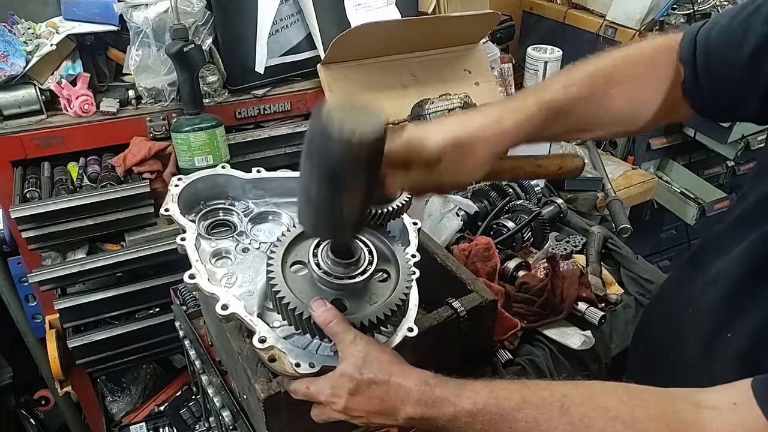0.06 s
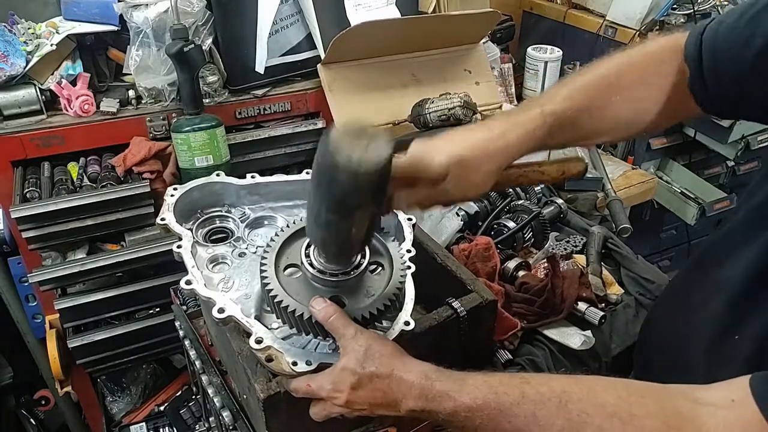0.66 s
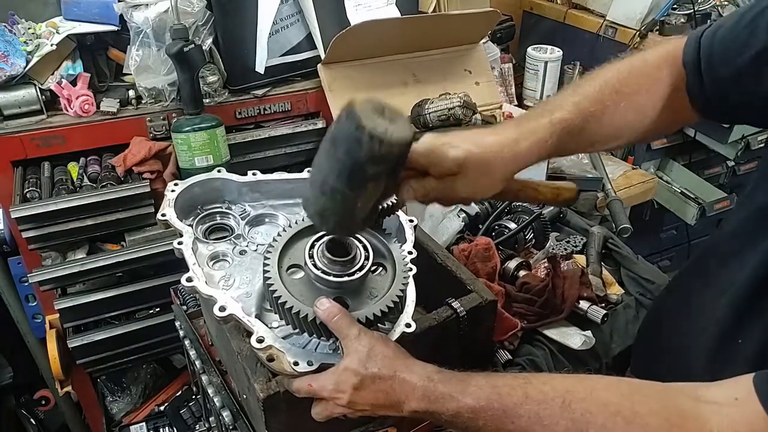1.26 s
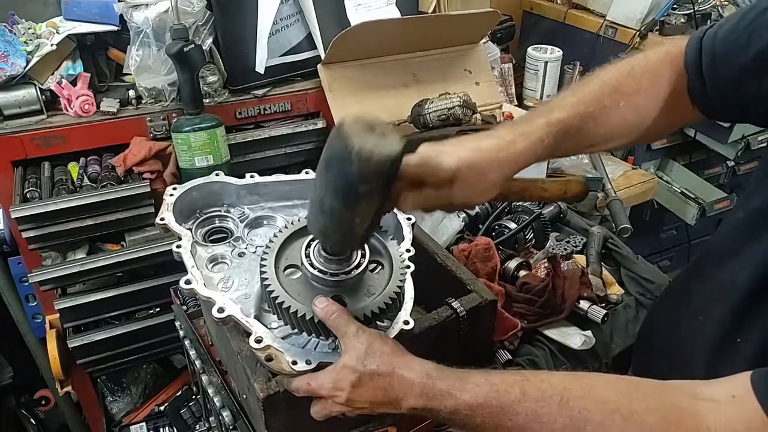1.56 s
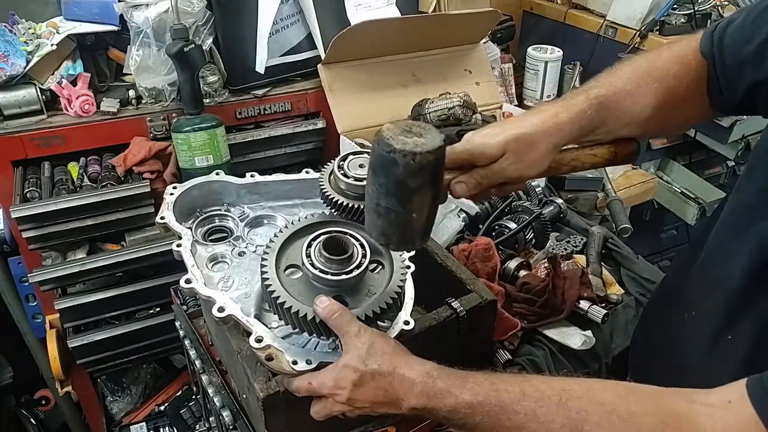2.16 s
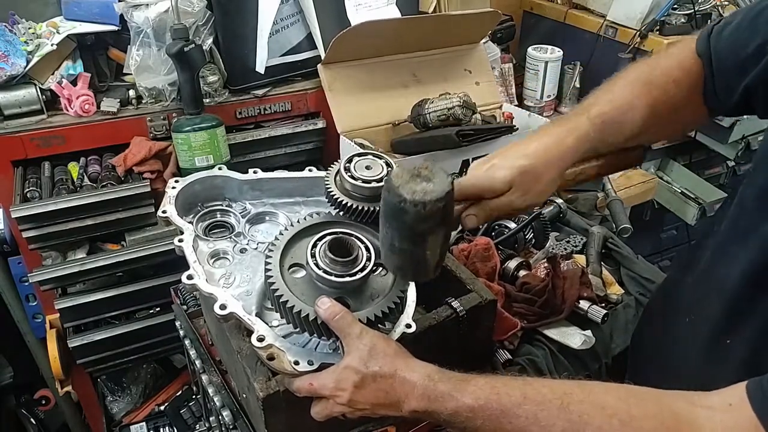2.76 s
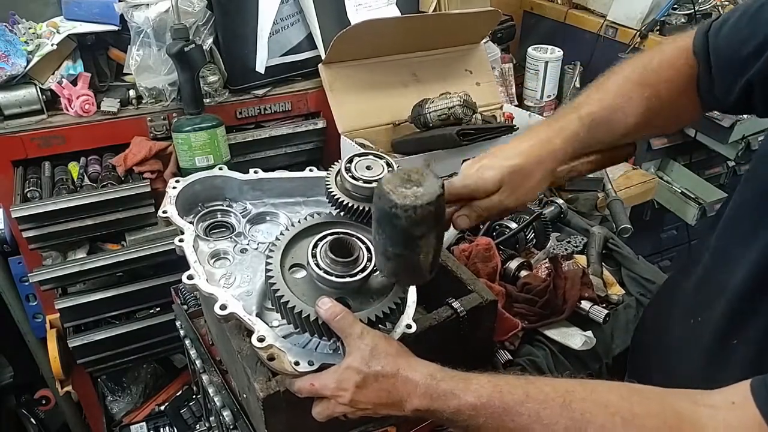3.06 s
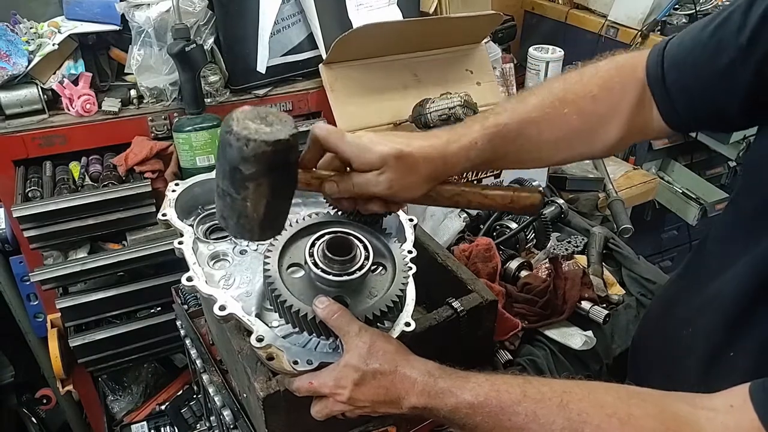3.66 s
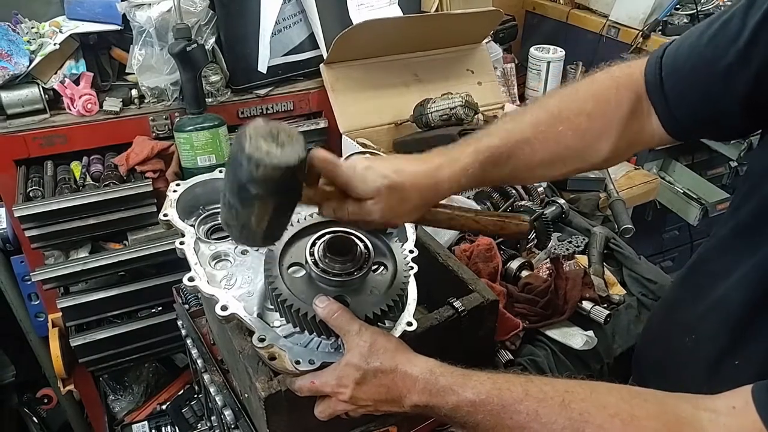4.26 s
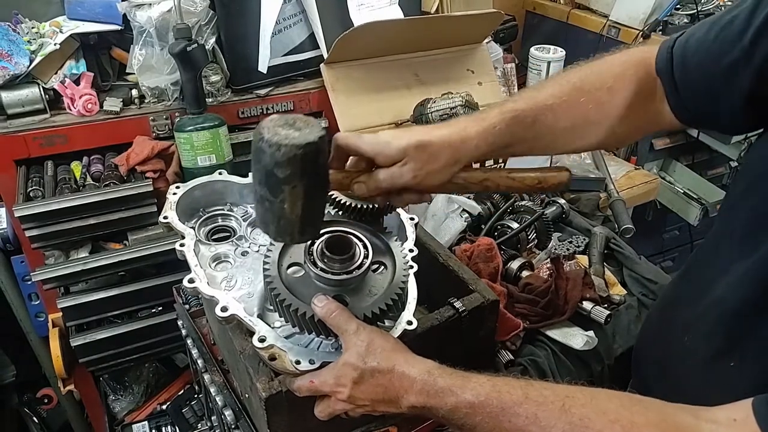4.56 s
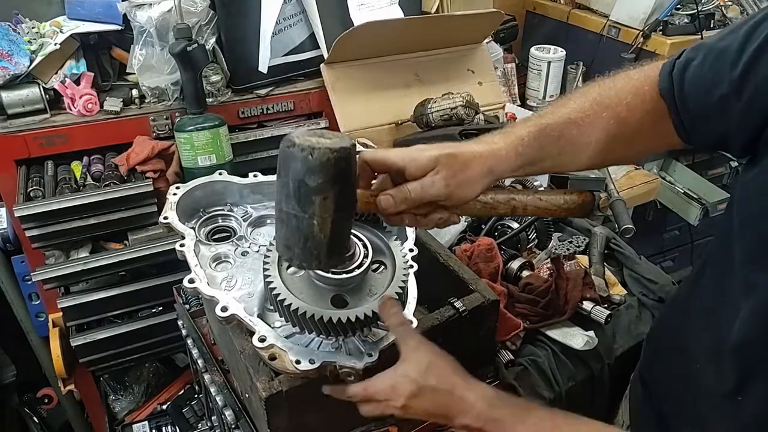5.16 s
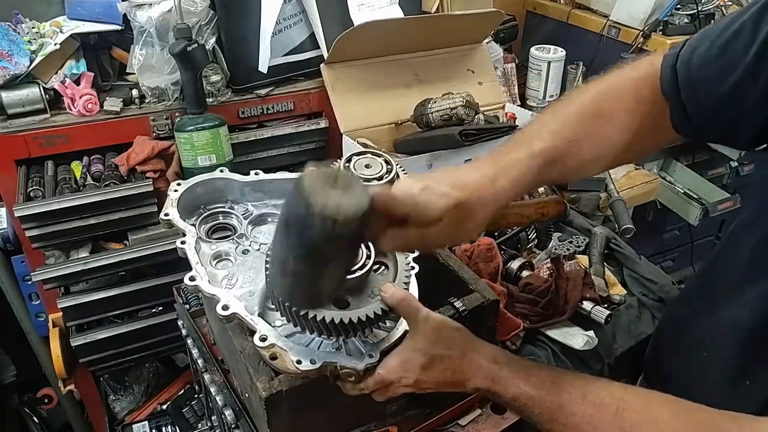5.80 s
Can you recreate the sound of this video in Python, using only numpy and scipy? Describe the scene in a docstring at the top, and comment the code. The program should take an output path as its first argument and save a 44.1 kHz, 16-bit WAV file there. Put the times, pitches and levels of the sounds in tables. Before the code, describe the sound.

A rubber mallet taps a steel gear in a metal case, each blow thudding with a clank and brief metallic ring.

```python
"""A workshop bench in a small, cluttered room, where a rubber mallet drives a steel gear and its bearing
into an aluminium gearbox case. Each impact excites damped modes: bench and case thump, loose parts
clank, and the gear rings like a bell, two close modes beating. The parts settle with a few light
knocks. Behind them a fan gives a rush of air and a motor hum."""
import sys
import numpy as np
from scipy import signal
from scipy.io import wavfile

SR = 44100
rng = np.random.default_rng(int(sys.argv[2]) if len(sys.argv) > 2 else 0)


def to_wav(sig):
    """Store sig (one row per channel, or 1-D mono) as 16-bit WAV at the path in sys.argv[1].

    Samples outside -1..1 are clipped; the rate is SR.
    """
    pcm = np.clip(np.atleast_2d(sig), -1, 1) * 32767
    pcm = np.round(pcm).astype(np.int16)
    wavfile.write(sys.argv[1], SR, pcm.T)  # frames by channels


N = 265923

# mallet blows: (time [s], spot, force [dB], contact hardness [dB], gear note [dB], free ringing [s])
BLOWS = [(0.0966, "hub", -1, -3, -12.5, 0.75), (0.3869, "hub", 1.64, -1.5, -18.5, .22),
         (0.6866, "hub", 2, 7.5, -16.5, 0.14), (1.008, "hub", 2, -4.5, -17, 0.19),
         (1.315, "hub", -0.36, -6.5, -21, 0.13), (1.5942, "hub", 0.5, 9, -14, .16),
         (2.454, "right rim", -3, -0.5, -18.5, 0.12), (2.6787, "right rim", 0, -1, -33.5, 0.11),
         (2.9147, "right rim", 1.55, -1.5, -16.5, 0.076), (3.8004, "left rim", -9.5, 4, -29, 0.069),
         (4.0626, "left rim", -2, 0, -21, 0.16), (4.305, "left rim", -3, -3.5, -26.5, 0.13),
         (5.8441, "front rim", -1.5, -0.5, -26, 0.15)]
# excitation by striking point, spot: (bench boom [dB], case thud [dB], bearing [dB], gear overtones [dB])
SPOTS = {"hub": (-27, -18, -32, -25.5), "right rim": (-28.5, -16.5, -42.5, -28.5),
         "left rim": (-24, -20.5, -40.5, -36.5), "front rim": (-26.5, -22, -39, -35)}
# loose parts settling: (time [s], knock level [dB], ring of the gears [dB])
SETTLING_KNOCKS = [(.525, -34.5, -42), (1.922, -44.5, -65), (3.07, -39.5, -50.5), (4.437, -34, -47.5),
                   (5.242, -68, -71), (5.296, -62, -64.5), (5.311, -50, -54)]
# normal modes: (frequency [Hz], level [dB], decay time T60 [s])
GEAR_NOTE_MODES = [(2448, 0, .68), (2462, -7, .7)]   # the gear bending as a disc
GEAR_OVERTONE_MODES = [(5864, 0, .66), (10188, -14, .38)]   # the same with more nodal lines
BENCH_MODES = [(144, -8.5, 0.23), (166, -6, 0.21), (207.7, -11, 0.37), (260.1, 0.5, 0.19),
               (268, -3.5, 0.095), (319, -3.5, 0.13)]   # bench top
THUD_MODES = [(365, -4.5, 0.082), (381.6, 6, 0.18), (440, -0.5, 0.029), (472, -14, .18), (425, 5, 0.015)]   # case on the bench
WALL_MODES = [(818, -18.5, 0.31), (952, -18.5, 0.33), (1011, -14.5, 0.35), (1146, -16, .33),
              (1447, -13.5, 0.28), (1613, -15, 0.3), (1742, -19, 0.3), (1844, -13, 0.31), (1940, -17, 0.16),
              (2197, -13, 0.32), (2530, -11.5, 0.36), (2800, -20, 0.26), (3020, -20, 0.33),
              (3295, -16, .28), (3358, -16.5, 0.26), (3583, -17, 0.2), (4210, -21, 0.15), (4590, -20, 0.26),
              (6770, -27.5, 0.23), (7970, -26, 0.13)]   # case walls, each row a cluster of close modes
BEARING_MODES = [(4625, -1, .36), (4680, -3, .36), (6724, -8, .22), (7510, -11, .26), (8425, -11, .2),
                 (9259, -13, .3), (9668, -5, .28), (11160, -16, .3), (12166, -22, .3), (12538, -22, .3),
                 (14906, -27, .33)]   # races of the ball bearing
PINION_MODES = [(1028, -1, .3), (2980, -4, .22)]   # small loose gear
# dense modal spectra: (frequency [Hz], relative spectral density [dB], decay time T60 [s])
CLANK_SPECTRUM = [(40.57, -18, 0.32), (101, -13.5, 0.3), (158, -8, 0.16), (360, 2.5, 0.48),
                  (680, -2.5, 0.32), (940, 2.5, 0.33), (1900, 1.5, 0.33), (3140, 1, 0.25),
                  (4815, -10, 0.37), (7840, -12.5, .31), (11360, -26, 0.29), (14000, -27.5, 0.41),
                  (16000, -37, .33)]   # metal parts in the room
KNOCK_SPECTRUM = [(61.2, -11, .25), (361, -4.5, 0.19), (650, -1, 0.23), (1050, 4.5, 0.2), (1900, -6, 0.12),
                  (3000, -6.5, 0.087), (4900, -30.5, .15), (15000, -43, 0.077)]   # a light knock
# fan airflow: (frequency [Hz], relative spectral density [dB])
AIR_SPECTRUM = [(25, -38), (70, -16.5), (120, -22), (190, -13.5), (270, -6), (470, -1.5), (660, -25.5),
                (1200, -33), (2500, -31.5), (4500, -32), (9000, -38.5), (16000, -47)]
# fan motor: (frequency [Hz], rms level [dB])
MOTOR_HUM = [(263.8, -74), (355.3, -79.5)]
# sound field at two microphones: (frequency [Hz], left minus right [dB], correlation [-])
STEREO_FIELD = [(60, 0, .85), (150, .5, .96), (350, -.5, .88), (700, 1.5, .5), (1400, 0, .2),
                (2100, -2, .2), (2500, -7, .3), (3500, -6, .25), (5200, -1.5, .2), (8000, -4.5, .05),
                (15000, -2, 0)]

BAND_EDGES_HZ = np.geomspace(25, 17000, 27)
BAND_HZ = np.sqrt(BAND_EDGES_HZ[1:] * BAND_EDGES_HZ[:-1])
AGE = np.arange(SR) / SR   # time since an impact [s]
HALF_EACH_SIDE = np.array([[.5], [-.5]])   # splits a difference between left and right


def mallet(bands):
    """Impact excitation: the rubber face pushes the case onto the bench and the steel parts collide."""
    out = np.zeros((2, N))
    for time_s, spot, force_db, hard_db, note_db, free_s in BLOWS:
        boom_db, thud_db, bearing_db, overtone_db = SPOTS[spot]
        push_db = 0.21 * force_db - 0.3 * hard_db   # rubber cushions the blow; a hard contact pushes less
        boom = from_db(boom_db + push_db) * bench_boom()
        thud = from_db(thud_db + push_db) * case_thud()
        # the clank keeps its plain colour at a bearing level of -34.5 dB and a boom of -26 dB
        treble_db = bearing_db + 34.5 + 0.51 * hard_db   # a harder contact lifts the treble
        bass_db = boom_db + 26 + push_db - force_db   # a blow off the centre rocks the bench
        clank = from_db(force_db - 15) * parts_clank(bands, treble_db, bass_db)
        walls = from_db(force_db - 14) * case_walls()
        bearing = from_db(bearing_db + 0.5) * bearing_ring(force_db)
        add(out, time_s, low_cut(boom + thud) + clank + walls + bearing)
        add(out, time_s, gear_ring(note_db, overtone_db + force_db + hard_db, free_s))
    return out


def gear_ring(note_db, overtone_db, free_s, seating_db_per_s=190, rest_db=-28.5):
    """Beating: two close disc modes interfere; once the gear seats, damping leaves only a faint ring."""
    note = from_db(note_db) * ring(GEAR_NOTE_MODES, rise_s=.006, swell=.3, swell_hz=22)
    overtones = from_db(overtone_db) * ring(GEAR_OVERTONE_MODES, rise_s=.003, swell=.35, swell_hz=22)
    seated_s = np.maximum(AGE - free_s, 0)
    return (note + overtones) * from_db(np.maximum(-seating_db_per_s * seated_s, rest_db))


def parts_clank(bands, treble_db, bass_db):
    """Broadband excitation: brief metal contacts drive countless modes of the loose parts at once."""
    colour_db = treble_db * at_hz([(3500, 0.14), (7000, 0.91)], BAND_HZ)
    colour_db += bass_db * at_hz([(250, 0.64), (450, 0.56)], BAND_HZ)
    colour_db += rng.standard_normal(len(BAND_HZ))   # no two blows land on the same point
    crack = from_db(3) * rattle()
    return clatter(bands, CLANK_SPECTRUM, rise_s=0.0033, crack=crack, colour_db=colour_db)


def rattle(gap_s=0.002, contact_t60=0.0054, fade_s=0.0069, count=6):
    """Inelastic rebound: the envelope of a part bouncing in its clearance, weaker at each contact."""
    times_s = np.r_[0, np.cumsum(gap_s * rng.uniform(.4, 1.6, count - 1))]
    contacts = np.zeros(SR)
    contacts[(times_s * SR).astype(int)] = np.exp(-times_s / fade_s)
    decay_per_sample = decay(contact_t60)[1]
    return signal.lfilter([1], [1, -decay_per_sample], contacts + 1e-18)


def case_walls():
    """Interference: each cluster of close wall modes sounds as one strongly fluctuating partial."""
    return ring(WALL_MODES, rise_s=.0025, scatter_db=2.5, swell=1.2, swell_hz=35, detune=.006)


def case_thud(contact_s=0.0004, scatter_db=2.5):
    """Forced response: one smooth pulse from the soft rubber drives all low modes in phase."""
    pulse = AGE * np.exp(-AGE / contact_s)
    response = 0
    for hz, db, t60 in THUD_MODES:
        strength = from_db(db + scatter_db * rng.standard_normal())
        response += strength * decay(t60) * np.cos(2 * np.pi * hz * AGE)
    return -signal.fftconvolve(response, pulse / pulse.sum())[:SR]


def bench_boom():
    """Free vibration: the struck bench top booms in its low modes."""
    return ring(BENCH_MODES, rise_s=0.0063, scatter_db=3.2, swell=0.14, detune=0.0078)


def low_cut(vibration):
    """Low cut: the boom and thud lose their deepest tones below about 120 Hz."""
    return signal.sosfilt(signal.butter(6, 120, "high", fs=SR, output="sos"), vibration)


def bearing_ring(force_db):
    """Nonlinear excitation: the balls jump under firm blows, so the ring grows faster than the force."""
    return from_db(1.6 * force_db) * ring(BEARING_MODES, rise_s=.003, scatter_db=2, swell=.5)


def settling(bands):
    """Light impacts: the gears drop back against each other with a dull knock and a clink."""
    out = np.zeros((2, N))
    for time_s, knock_db, ring_db in SETTLING_KNOCKS:
        knock = clatter(bands, KNOCK_SPECTRUM, rise_s=.0015, crack=decay(.035))
        pinion = ring(PINION_MODES, rise_s=.004, scatter_db=1, swell=.8, swell_hz=25)
        note = from_db(-5) * ring(GEAR_NOTE_MODES, rise_s=.0068, scatter_db=.5)
        overtones = from_db(-18) * ring(GEAR_OVERTONE_MODES, rise_s=.005, scatter_db=.5)
        add(out, time_s, from_db(knock_db) * knock + from_db(ring_db) * (pinion + note + overtones))
    return out


def fan(bands, air_db=-60.5):
    """Flow noise and tones: a steady low rush of air with a faint hiss and motor hum."""
    air = sum(gain * band[:, ::-1] for gain, band in zip(band_gains(AIR_SPECTRUM), bands))
    t = np.arange(N) / SR
    hum = sum(np.sqrt(2) * from_db(db) * np.sin(2 * np.pi * hz * t) for hz, db in MOTOR_HUM)
    return from_db(air_db) * air + hum


def ring(modes, rise_s, scatter_db=0, swell=0, swell_hz=12, detune=0):
    """Modal superposition: a struck body sounds as a sum of damped sinusoids."""
    out = 0
    for hz, db, t60 in modes:
        phase_gap = np.arccos(correlation(hz))   # short waves reach the microphones out of step
        phase = rng.uniform(0, 2 * np.pi) + phase_gap * HALF_EACH_SIDE
        strength = from_db(db + scatter_db * rng.standard_normal())
        pitch_hz = hz * (1 + detune * rng.standard_normal())   # grip and seating shift the pitch
        reflections = 1 + swell * wander(swell_hz) if swell else 1
        mode = decay(t60) * np.exp(1j * (2 * np.pi * pitch_hz * AGE + phase))
        out += strength * stereo_gains(hz) * (reflections * mode).imag
    return out * (1 - np.exp(-AGE / rise_s))


def clatter(bands, spectrum, rise_s, crack, colour_db=0):
    """Modal overlap: dense modes merge into noise, a crack and then a tail that dies band by band."""
    out, start = 0, rng.integers(N - SR)
    for band, hz, gain in zip(bands, BAND_HZ, band_gains(spectrum) * from_db(colour_db)):
        envelope = crack + decay(at_hz(spectrum, hz, column=2))
        out += gain * envelope * band[:, start:start + SR]
    return out * (1 - np.exp(-AGE / rise_s))


def wander(corner_hz):
    """Random modulation: amplitude and phase drift separately at each microphone, at about unit power."""
    pole = np.exp(-2 * np.pi * corner_hz / 1000)   # 1000 steps per second
    steps = rng.standard_normal((2, 1500)) + 1j * rng.standard_normal((2, 1500))
    drift = signal.lfilter([1], [1, -2 * pole, pole * pole], steps)[:, 500:]
    return np.array([np.interp(AGE, np.linspace(0, 1, len(row)), row / row.std()) for row in drift])


def noise_bands():
    """Spatial coherence: narrow bands of stereo noise, alike in both channels where waves are long."""
    white, bands = rng.standard_normal((2, 2, N)), []
    for k, hz in enumerate(BAND_HZ):
        bandpass = signal.butter(3, BAND_EDGES_HZ[k:k + 2], "band", fs=SR, output="sos")
        mid, side = signal.sosfilt(bandpass, white[k % 2])
        alike = correlation(hz)
        band = np.sqrt(1 + alike) * mid + np.sqrt(1 - alike) * side * np.array([[1], [-1]])
        bands.append(band / band.std() * stereo_gains(hz))
    return bands


def band_gains(spectrum):
    """Band power is density times bandwidth; the gains give a total power of 1."""
    gains = from_db(at_hz(spectrum, BAND_HZ)) * np.sqrt(np.diff(BAND_EDGES_HZ))
    return gains / np.linalg.norm(gains)


def stereo_gains(hz):
    """Level difference between the microphones, as left and right gains."""
    return from_db(at_hz(STEREO_FIELD, hz) * HALF_EACH_SIDE)


def correlation(hz):
    """Correlation of the pressures at the two microphones."""
    return np.clip(at_hz(STEREO_FIELD, hz, column=2), -1, 1)


def decay(t60):
    """Exponential damping: 60 dB in t60 seconds."""
    return np.exp(-np.log(1000) * AGE / t60)


def at_hz(table, hz, column=1):
    """Interpolation of one column on a log-frequency axis."""
    table = np.array(table)
    return np.interp(np.log(hz), np.log(table[:, 0]), table[:, column])


def from_db(db):
    """Amplitude ratio of a level in decibels."""
    return 10 ** (np.asarray(db) / 20)


def add(out, time_s, sound):
    """Superposition of a sound from time_s onward."""
    start = round(time_s * SR)
    out[:, start:start + sound.shape[1]] += sound[:, :N - start]


def scene():
    """Linear superposition: the pressures of blows, settling parts and fan add."""
    bands = noise_bands()
    return mallet(bands) + settling(bands) + fan(bands)


def record(dry):
    """Soft saturation rounds only the highest peaks; a low-pass filter limits the bandwidth."""
    rounded = dry / (1 + dry ** 8) ** (1 / 8)
    lowpass = signal.ellip(10, .1, 80, 15800, fs=SR, output="sos")
    return signal.sosfilt(lowpass, rounded)


dry = scene()
out = record(dry)
to_wav(out)
```